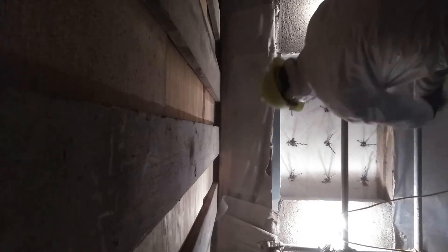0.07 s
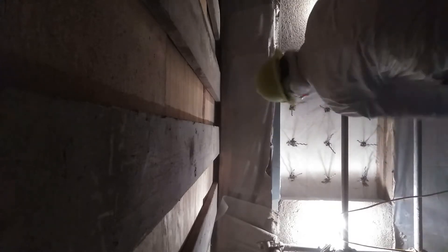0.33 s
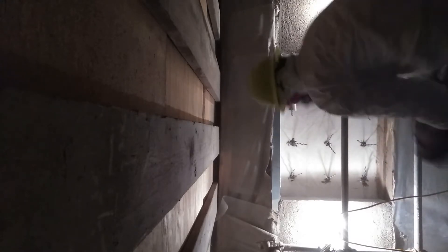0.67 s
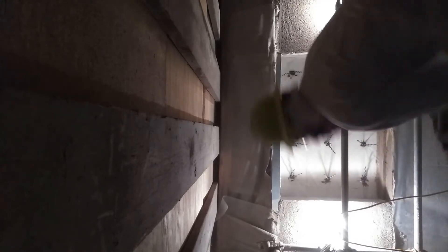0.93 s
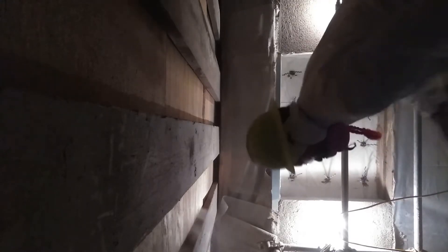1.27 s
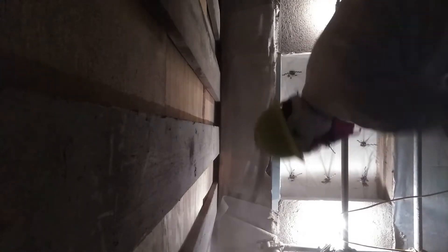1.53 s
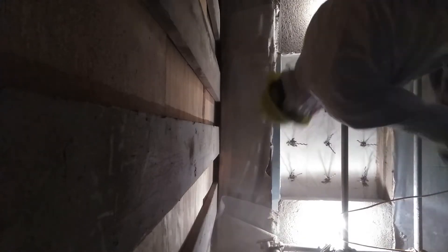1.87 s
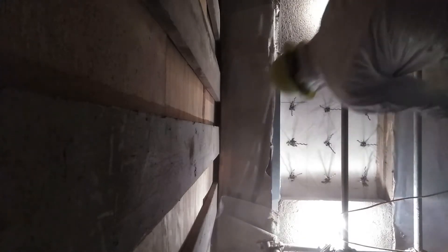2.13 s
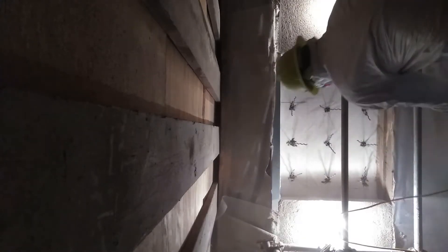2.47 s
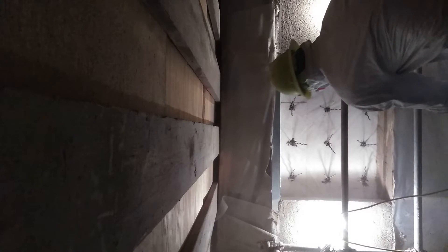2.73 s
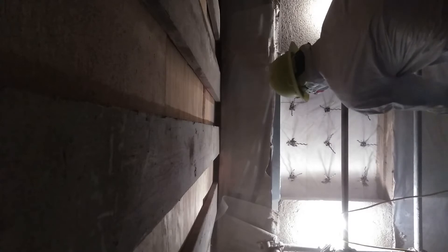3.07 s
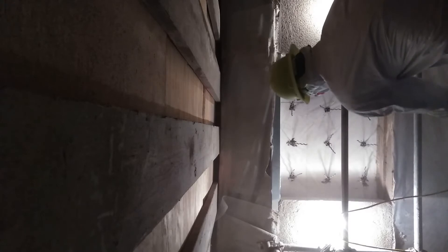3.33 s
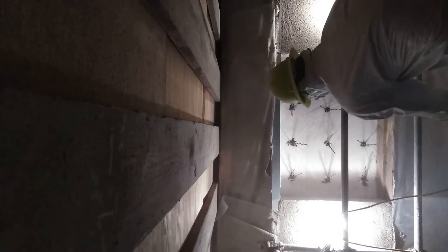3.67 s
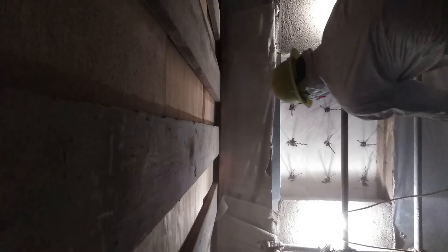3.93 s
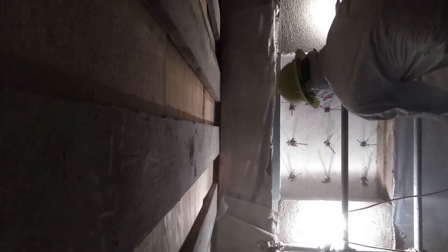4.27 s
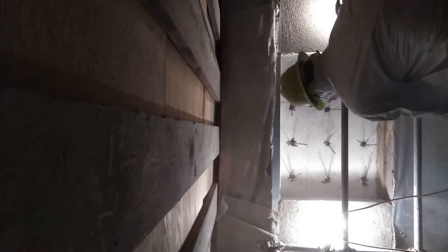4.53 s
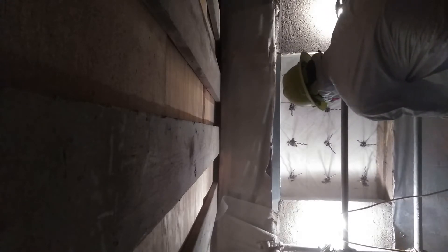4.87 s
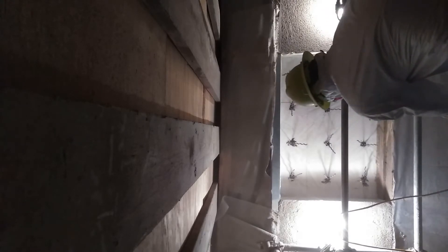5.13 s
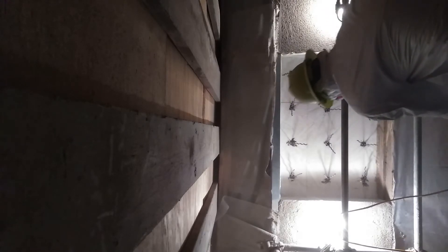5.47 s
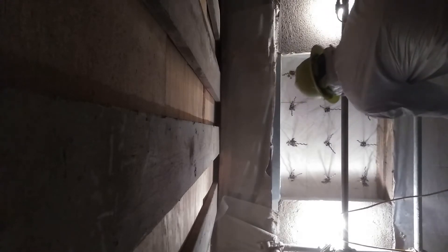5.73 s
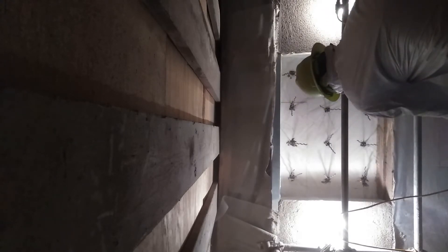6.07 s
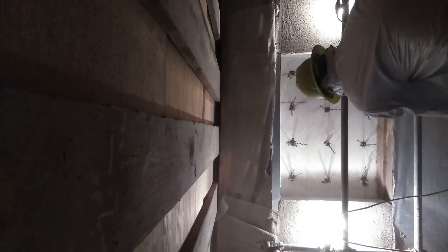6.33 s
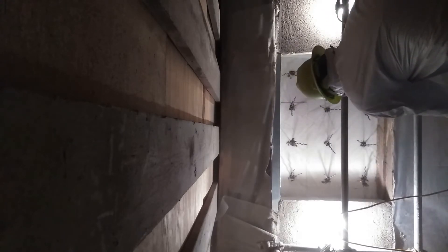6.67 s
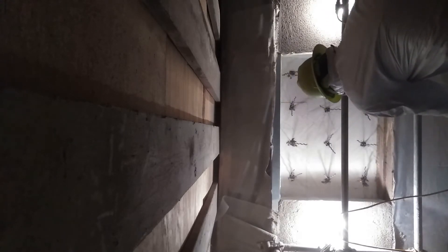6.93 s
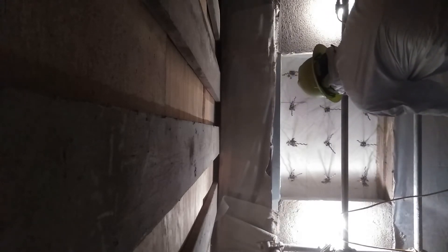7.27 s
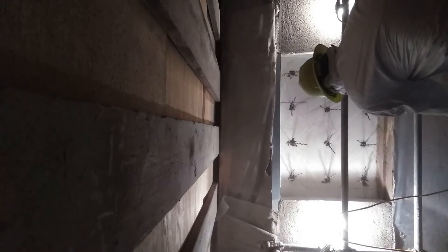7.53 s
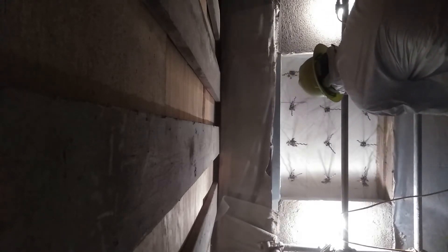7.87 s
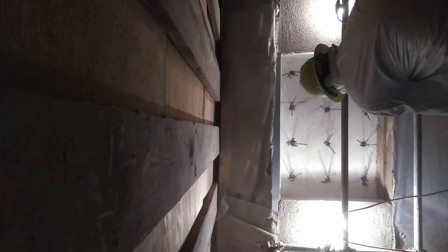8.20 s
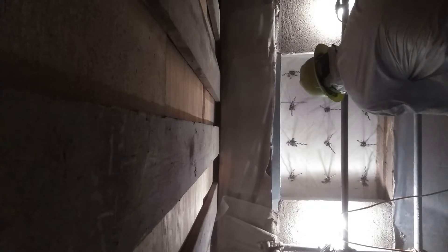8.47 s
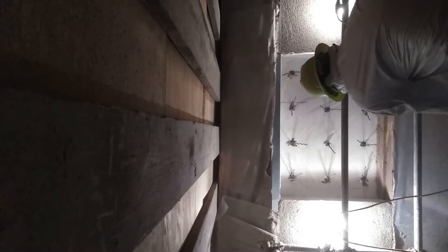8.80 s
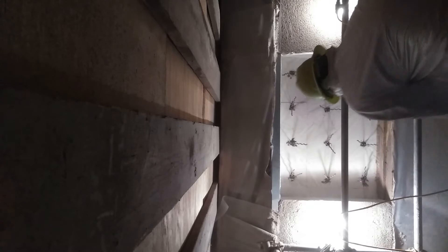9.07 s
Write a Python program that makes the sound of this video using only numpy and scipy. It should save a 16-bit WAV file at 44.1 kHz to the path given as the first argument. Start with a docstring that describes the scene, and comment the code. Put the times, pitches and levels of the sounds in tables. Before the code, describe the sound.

A spray nozzle bursts and spits wet mortar, then hisses steadily while a hose thumps and a compressor rumbles behind.

```python
"""Inside a boarded shaft, close to a worker spraying mortar with a compressed-air gun.
The nozzle blasts twice, with a hollow rush between, then settles to a steady hiss and patter on the wall.
Wet clots spit, slugs thump in the hose, and a compressor drones behind; the boards add quick reflections.
The microphone's two ports face opposite ways. Pan is the left port's level over the right's."""
import sys
import numpy as np
from scipy import signal
from scipy.fft import rfft, irfft, next_fast_len
from scipy.io import wavfile
from scipy.ndimage import uniform_filter1d

SR = 44100
rng = np.random.default_rng(int(sys.argv[2]) if len(sys.argv) > 2 else 0)


def wav_record(signal):
    """Record a signal, one row per channel, as 16-bit PCM in the file named by sys.argv[1]."""
    frames = np.transpose(np.atleast_2d(signal))
    bounded = np.clip(frames, -1, 1)
    # unit amplitude maps onto the largest positive 16-bit level
    quanta = np.round(bounded * 32767).astype(np.int16)
    wavfile.write(sys.argv[1], SR, quanta)


N = 402191
HZ = np.fft.rfftfreq(1024, 1 / SR)
FRAME_S = np.arange(N // 256 + 3) * 256 / SR
# the low drone, quiet under the opening blasts, then rising and holding steady: t/s, level/dB
DRONE_LEVEL = [(0, -41.5), (1.2, -40.5), (2.5, -36.5), (5, -34), (7.5, -35.5), (9.12, -35)]


def roar(trim_db=4.5):
    """The turbulent plume: bright when aimed at the microphone, hollow once mortar loads the nozzle."""
    blasts = [(0, -19.5, -10, -7), (.07, -14, -4, 3), (.15, -14.5, -2.5, -4), (.3, -50.5, 2, 1),
              (.53, -41, 0, 0), (.62, -30.5, 0, -4), (.78, -23.5, -3, -8), (.91, -22, -8, 1),
              (.965, -13, -9, 3), (1.05, -13, -15, -7), (1.11, -20, -2, -3.5), (1.3, -26.5, -5, -8),
              (1.41, -30.5, -8, -20), (1.48, -25, -13, -3), (1.62, -24.5, -2.5, -7),
              (1.85, -29.5, -2.5, -6), (2.3, -33, 1, -9)]  # t/s, level/dB before trim, pan/dB, treble tilt/(dB per octave)
    colour = [(500, -16), (1200, -15.5), (1700, -3), (2100, -0.5), (2600, -2.5), (3200, -1), (3700, -3),
              (4200, -1.5), (5000, -3.5), (6000, -8), (10000, -23)]  # open plume: f/Hz, level/dB
    loading = [(.7, 0), (1.4, 1)]  # mortar fills the nozzle: t/s, resonance strength/(0-1)
    modes = [(1770, 810, -9), (2500, 580, 9.5)]  # loaded nozzle: f/Hz, width/Hz, lift/dB
    level, pan, tilt = follow(blasts, fade_db_per_s=130)
    loaded = follow(loading, fade_db_per_s=0)[0]
    octaves = np.log2(np.clip(HZ, 3000, 8000) / 3000)
    colour_db = read(colour) + tilt * octaves + loaded * lift_db(modes)
    return plume(level + trim_db, pan, colour_db, patchy_db=3.5)


def jet(trim_db=6.5):
    """Sharp hiss at the mouth, duller or brighter as the nozzle turns."""
    hiss = [(0, -15.5, 5, -4.5), (.11, -18.5, 11, -6), (.2, -26, 4, -3), (.32, -26, 20, -7),
            (.42, -25.5, 17, -7.5), (.475, -20.5, 25, -7.5), (.59, -24, 18, -5), (.68, -26, 4, -2.5),
            (.78, -25, 2, -6), (.835, -18.5, 5, -3.5), (1.04, -18, -2, -1.5), (1.13, -31.5, -2, -5),
            (1.19, -24, 4, 0), (1.31, -33.5, 2, -6)]  # t/s, level/dB before trim, pan/dB, brightness
    colour = [(2000, -23.5), (4900, -15.5), (5250, -0.5), (5800, -5.5), (6400, -2), (7200, -1), (8000, -3),
              (8900, 0.5), (9450, -2.5), (9900, -9), (12000, -16.5), (15500, -18)]  # f/Hz, level/dB
    level, pan, brightness = follow(hiss)
    top_octave = 1 / (1 + (7900 / (HZ + 1)) ** 20)
    shape = unit(gain_of(read(colour) + 1.9 * (brightness + 4) * top_octave))
    return gain_of(level + trim_db) * panned(pan) * shape * eddies(2.55, size=(14, 12))


def impact(trim_db=4, aim_db=-1, last_pan_db=-4.5):
    """A lower rush lands each time the plume sweeps the near wall, then swings towards the middle."""
    # start/s, end/s, first and last level/dB before trim, first pan/dB before aim, release/(dB per s)
    passes = [(0.072, 0.158, -20.5, -17.5, -14, 400), (0.983, 1.14, -11.5, -18.5, -23, 75),
              (1.464, 2.273, -28, -34, -13, 110)]
    colour = [(150, -28), (400, -21), (650, -18.5), (790, 0), (1000, -1), (1250, 8), (1450, -4.5),
              (1800, -5), (3000, -45)]  # f/Hz, level/dB
    power = 0
    for start, end, first_db, last_db, pan_db, release in passes:
        level = held(start, end, first_db, last_db, attack_db_per_s=750, release_db_per_s=release)
        pan = np.interp(FRAME_S[:, None], [start, end], [pan_db, last_pan_db])
        power += plume(level + trim_db, pan + aim_db, read(colour), patchy_db=2.0) ** 2
    return np.sqrt(power)


def plume(level, pan, colour_db, patchy_db):
    """Broad turbulence that swings from port to port with the gun."""
    return gain_of(level) * panned(pan) * unit(gain_of(colour_db)) * eddies(patchy_db, size=(9, 7))


def hollow(trim_db=4.5):
    """Air blows across the nearly empty nozzle's cavity and sounds its broad resonances."""
    airflow = [(0, -32, -12, 1630), (.1, -22, -7, 1700), (.17, -25, 3, 1380), (.32, -38, 1, 1480),
               (.52, -27, -1, 1580), (.66, -29, 0, 1540), (.78, -26, -13, 1510), (.99, -27, -27, 1580),
               (1.05, -20, -27, 1440)]  # t/s, level/dB before trim, pan/dB, resonance f/Hz
    modes = [(.42, 130, -12), (1, 302, 1), (2.07, 380, -13)]  # multiple of the resonance, width/Hz, level/dB
    level, pan, centre = follow(airflow)
    shape = sum(gain_of(db) / (1 + 2 * ((HZ - k * centre) / width) ** 2) ** 1.4 for k, width, db in modes)
    return gain_of(level + trim_db) * panned(pan) * unit(shape)


def fizz(trim_db=10.5, brighten=0.51):
    """Smooth air hiss of the steady spray, hollowed by the nozzle's bore."""
    flow = [(1.1, -30), (1.3, -29.5), (1.37, -30), (1.46, -28), (2.59, -33), (4.7, -35.5), (9.12, -35.5)]  # t/s, level/dB before trim
    colour = [(1000, -20), (1900, -8.5), (2900, -5), (3600, -4), (4500, -4.5), (5600, -4.5), (7000, -2),
              (7800, -3.5), (8500, -1), (9800, -1.5), (11000, -8.5), (12400, -16), (15500, -19)]  # f/Hz, level/dB
    bore_modes = [(2480, 120, 3), (2970, 170, -2), (3460, 300, 0), (5600, 740, -1)]  # f/Hz, width/Hz, lift/dB
    level = follow(flow)[0]
    # a harder jet gains most in the extreme treble
    force = np.maximum(level - np.median(level), 0) * read([(9500, 0), (12500, 0.55)])
    shape = unit(gain_of(read(colour) + lift_db(bore_modes)))
    return gain_of(level + trim_db + brighten * force) * shape * eddies(0.81, size=(5, 24))


def patter(trim_db=6.5):
    """Mortar lands in lumps and sounds the wall's resonances."""
    landing = [(1.2, -41.5), (2.1, -34.5), (2.9, -38), (4.5, -36), (7.75, -34.5), (9.12, -37)]  # t/s, level/dB before trim
    colour = [(200, -15.5), (400, -9.5), (480, -1), (640, -0.5), (860, -1), (1100, 1.5), (1450, -1.5),
              (1700, -3.5), (2000, -9), (3500, -26)]  # f/Hz, level/dB
    wall_modes = [(655, 150, 5), (1170, 62, -2.5), (1233, 97, 2.5), (1677, 36, 4.5), (2615, 78, 9),
                  (3590, 200, 0)]  # f/Hz, width/Hz, lift/dB
    shape = unit(gain_of(read(colour) + lift_db(wall_modes)))
    return gain_of(follow(landing)[0] + trim_db) * shape * eddies(1.97, size=(5, 9))


def spray():
    """Hiss and patter together; the right port faces away and loses the treble."""
    shadow = [(200, 12.5), (400, -4.5), (520, -11.5), (640, -15), (880, -2), (1000, -8), (1120, -5),
              (1600, -6), (2000, -5), (3000, -4.5), (4000, -11), (5000, -14), (5700, -25), (7000, -21.5),
              (9000, -29.5), (15000, -20)]  # right port: f/Hz, gain/dB
    ports = gain_of([0 * HZ, read(shadow)])[:, None]
    return ports * np.hypot(fizz(), patter())


def sputters():
    """Three resonances fed unevenly by passing grit, all to the left."""
    # each: t/s, level/dB, f/Hz, half-width/Hz
    ring = [(2.3, -34, 1480, 170), (3, -37.5, 1450, 165), (4.6, -47, 1310, 130), (5.8, -39.5, 1270, 38),
            (7.2, -37.5, 1302, 34), (8.4, -37, 1294, 36), (9.12, -42, 1305, 50)]  # the nozzle under load
    whistle = [(3.3, -65, 3600, 200), (4.7, -39.5, 3620, 160), (6.3, -51, 3560, 190), (8.2, -46, 3050, 550),
               (9.12, -37.5, 2900, 700)]  # thin whistle of air
    burble = [(6.6, -61, 520, 90), (7.1, -37.5, 520, 48), (8.35, -40, 508, 50), (8.7, -60, 500, 60)]  # mortar entering the wet layer
    layers = []
    for curve, pan_db, flutter_db in (ring, 6.5, 3.5), (whistle, 14, 1), (burble, 11, 3.5):
        level, centre, width = follow(curve, fade_db_per_s=60)
        shape = unit(1 / (1 + ((HZ - centre) / width) ** 2))
        flutter = eddies(flutter_db, size=(5, 60))
        layers.append(gain_of(level) * shape * flutter * panned(pan_db)[:, None, None])
    return layers


def clots(rise_s=0.011, relative_width=0.089):
    """A wet clot leaves the nozzle or slaps the wall: a splutter of noise through one resonance."""
    slaps = [(.14, -11.5, 1260, -8), (.16, -18, 700, -4), (0.167, -19.5, 407, -3), (0.429, -32.5, 1200, 13),
             (.875, -22, 637, -13), (.93, -26, 650, -14), (1.121, -9, 1240, -10), (2.555, -35, 1200, 7),
             (2.998, -26.5, 1350, 8), (5.791, -28.5, 1200, 11), (5.901, -32, 1700, 4),
             (7.284, -27, 525, 12), (7.335, -29, 510, 12), (7.54, -31, 520, 14), (7.625, -30, 726, 7),
             (8.733, -28, 1290, 14)]  # t/s, level/dB, f/Hz, pan/dB
    t, out = np.arange(SR // 8) / SR, np.zeros((2, N))
    f = np.fft.rfftfreq(len(t), 1 / SR)
    swell = t / rise_s * np.exp(1 - t / rise_s)
    for s, db, hz, pan in slaps + spits():
        noise = rfft(rng.standard_normal(len(t)))
        ring = irfft(noise / (1 + ((f / hz - 1) / relative_width) ** 2), len(t))
        splutter = gain_of(db) * evened(ring * swell) * np.sqrt(np.mean(swell ** 2))
        for port, gain in zip(out, panned(pan)):
            add(port, s, gain * splutter)
    return out


def spits(start=2.2, end=9.0, per_s=4.5, level_db=-36.5, spread_db=1.5, pan_db=4):
    """Small clots at random in the steady spray, as rows of t/s, level/dB, f/Hz, pan/dB."""
    resonances_hz = np.array([990, 1290, 1680])
    when, softness, which = rng.random((round(per_s * (end - start)), 3)).T
    s = np.interp(when, [0, 1], [start, end])
    db = level_db - spread_db * (2 * softness - 1)
    hz = resonances_hz[(which * len(resonances_hz)).astype(int)]
    return [(*row, pan_db) for row in zip(s, db, hz)]


def thumps(trim_db=9, rise_s=0.0082):
    """Each slug shoves the hose into a few low cycles."""
    slugs = [(1.125, -29, 105), (2.01, -35, 200), (2.203, -27.5, 145), (2.449, -32, 110), (2.511, -28, 125),
             (2.586, -26, 115), (2.807, -22, 116), (2.861, -40, 165), (2.995, -19.5, 119),
             (3.206, -24, 111), (3.38, -33, 118), (3.84, -35, 192), (4.16, -33, 200), (4.947, -31, 197),
             (5.19, -40, 62), (5.33, -37, 55), (6.191, -32, 195), (8.609, -33.5, 181)]  # t/s, level/dB before trim, f/Hz
    t, out = np.arange(SR // 6) / SR, np.zeros(N)
    swell = (t / rise_s) ** 2 * np.exp(2 * (1 - t / rise_s))
    for s, db, hz in slugs:
        add(out, s, gain_of(db + trim_db) * swell * np.sin(2 * np.pi * hz * t))
    return out


def buffet():
    """The hose shakes while it fills."""
    colour = [(20, -24), (45, -16), (70, -3), (120, 3.5), (190, -5), (260, -12), (400, -23), (1000, -50)]  # f/Hz, level/dB
    level = held(start=2.0, end=3.3, first_db=-35, last_db=-32, attack_db_per_s=90, release_db_per_s=100)
    return rumble(level, colour, patchy_db=2.5, pan_db=11)


def drone():
    """The compressor rumbles behind the gun."""
    colour = [(15, -34), (40, -14), (60, -4), (85, -0.5), (110, -4), (135, 0), (160, -8.5), (190, 11),
              (235, -6.5), (310, 0.5), (380, -8.5), (600, -5), (1500, -49)]  # f/Hz, level/dB
    return rumble(follow(DRONE_LEVEL)[0], colour, patchy_db=3.5, pan_db=2.5)


def hum(waver_hz=2.53):
    """Wavering compressor tones, quieter when the drone is quiet."""
    tones = [(135, -52.5), (268, -53), (297, -50.5)]  # f/Hz, full level/dB
    t, out = np.arange(N) / SR, np.zeros(N)
    for hz, db in tones:
        waver = waver_hz * evened(uniform_filter1d(rng.standard_normal(len(FRAME_S)), size=20))
        phase = 2 * np.pi * np.cumsum(hz + np.interp(t, FRAME_S, waver)) / SR
        out += gain_of(db) * np.sqrt(2) * np.sin(phase)
    level = follow(DRONE_LEVEL)[0][:, 0]
    dip_db = np.minimum(level - np.median(level), 0)
    return out * gain_of(np.interp(t, FRAME_S, dip_db))


def rumble(level, colour, patchy_db, pan_db):
    """Uneven low noise that fills the shaft."""
    shape = unit(gain_of(read(colour)))
    return gain_of(level) * shape * eddies(patchy_db, size=(8, 5)) * panned(pan_db)[:, None, None]


def shaft(x, echo_trim_db=-10, t60=0.038, echoes_per_s=2000):
    """Quick reflections between the boards ripple the spectrum."""
    t = np.arange(SR // 10) / SR
    taps = rng.standard_normal((2, len(t))) * (rng.random((2, len(t))) < echoes_per_s / SR)
    taps *= (t > .003) * gain_of(-60 * t / t60)
    taps *= gain_of(echo_trim_db) / np.linalg.norm(taps, axis=1, keepdims=True)
    # long waves fill the shaft evenly and the rough boards soak up the treble
    taps = signal.sosfilt(signal.butter(1, [900, 5000], "band", fs=SR, output="sos"), taps)
    return (x + signal.oaconvolve(x, taps, axes=1)[:, :N]) / np.hypot(1, gain_of(echo_trim_db))


def rush(layers, likeness):
    """Noise at both ports carrying the summed power of the layers' spectra."""
    coherence = [(50, 1), (300, 1), (480, 0.9), (680, 0.97), (1000, 0.74), (1300, 0.46), (1700, 0.41),
                 (2100, 0.081), (4000, 0.21), (9000, 0.12)]  # between the ports: f/Hz, relative likeness
    same = np.clip(likeness * read(coherence), 0, 1)
    a, b, c, d = rng.standard_normal((4, len(FRAME_S), len(HZ)))
    left = a + 1j * b
    right = (same * left + np.sqrt(1 - same ** 2) * (c + 1j * d)) * port_turn(HZ)
    spectra = np.array([left, right]) * np.sqrt(sum(layer ** 2 for layer in layers))
    return signal.istft(spectra.transpose(0, 2, 1), nperseg=1024, noverlap=768)[1][:, :N]


def port_turn(hz, bass_turn_rad=2.83, lead_ms=0.582):
    """Phase of the right port: nearly inverted in the bass, earlier than the left above it."""
    return np.exp(1j * np.maximum(bass_turn_rad, 2 * np.pi * hz * lead_ms / 1000))


def at_ports(pair):
    """Gives the right port its phase against the left."""
    size = next_fast_len(N)
    right = irfft(rfft(pair[1], size) * port_turn(np.fft.rfftfreq(size, 1 / SR)), size)[:N]
    return np.array([pair[0], right])


def panned(pan_db):
    """Gains of the two ports at constant power."""
    pair = np.array([gain_of(pan_db / 2), gain_of(-pan_db / 2)])
    return pair / np.sqrt(np.mean(pair ** 2, axis=0))


def eddies(depth_db, size):
    """Random gain patches, size = (frames, bins)."""
    field = rng.standard_normal((len(FRAME_S), len(HZ)))
    patches = uniform_filter1d(uniform_filter1d(field, size[0], axis=0), size[1], axis=1)
    return gain_of(depth_db * evened(patches))


def follow(rows, fade_db_per_s=150):
    """The columns of a curve at every frame; the level dies away outside its span."""
    s, *columns = np.transpose(rows)
    level, *rest = (np.interp(FRAME_S, s, c)[:, None] for c in columns)
    outside = abs(FRAME_S - np.clip(FRAME_S, s[0], s[-1]))[:, None]
    return [level - fade_db_per_s * outside] + rest


def held(start, end, first_db, last_db, attack_db_per_s, release_db_per_s):
    """Level in dB at every frame: attack, a sloping hold, release."""
    t = FRAME_S[:, None]
    hold = np.interp(t, [start, end], [first_db, last_db])
    return hold - attack_db_per_s * np.maximum(start - t, 0) - release_db_per_s * np.maximum(t - end, 0)


def read(points):
    """A spectrum table at every bin, interpolated in log frequency."""
    f, value = np.transpose(points)
    return np.interp(np.log(HZ + 1), np.log(f + 1), value)


def lift_db(modes):
    """Bell-shaped peaks and dips on a spectrum."""
    return sum(db / (1 + (2 * (HZ - hz) / width) ** 2) for hz, width, db in modes)


def unit(shape):
    """Scales each frame of a magnitude spectrum to total power 1."""
    return shape / np.sqrt(np.sum(shape ** 2, axis=-1, keepdims=True))


def evened(x):
    """Scales to rms 1."""
    return x / np.sqrt(np.mean(x ** 2) + 1e-20)


def gain_of(db):
    """Decibels to amplitude."""
    return 10 ** (np.asarray(db) / 20)


def add(mix, s, sound):
    """Mixes a sound in at time s."""
    part = mix[max(round(s * SR), 0):][:len(sound)]
    part += sound[:len(part)]


def scene():
    """The gun close by, the hose and compressor to the left, the boards all round."""
    blasts = rush([jet(), roar(), impact(), hollow()], likeness=0.83)
    steady = rush([*sputters(), drone(), buffet(), spray()], likeness=0.97)
    machinery = panned(pan_db=6)[:, None] * (hum() + thumps())
    return shaft(blasts + steady + at_ports(machinery + clots()))


def record(dry, bass_cut_hz=42, edge_hz=15750):
    """Bass cut of the microphone, overload at full scale, then the band limit."""
    bass_cut = signal.butter(4, bass_cut_hz, "high", fs=SR, output="sos")
    wave = np.clip(signal.sosfilt(bass_cut, dry), -1, 1)
    band_limit = signal.firwin(511, edge_hz, window=("kaiser", 9), fs=SR)
    return signal.oaconvolve(wave, band_limit[None], "same")


dry = scene()
out = record(dry)
wav_record(out)
```